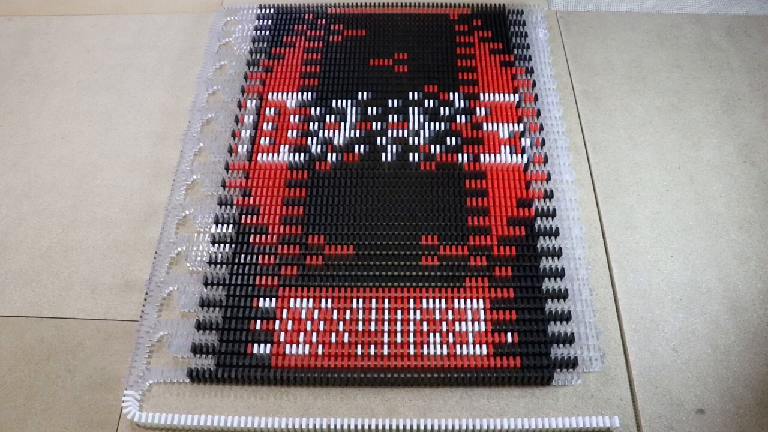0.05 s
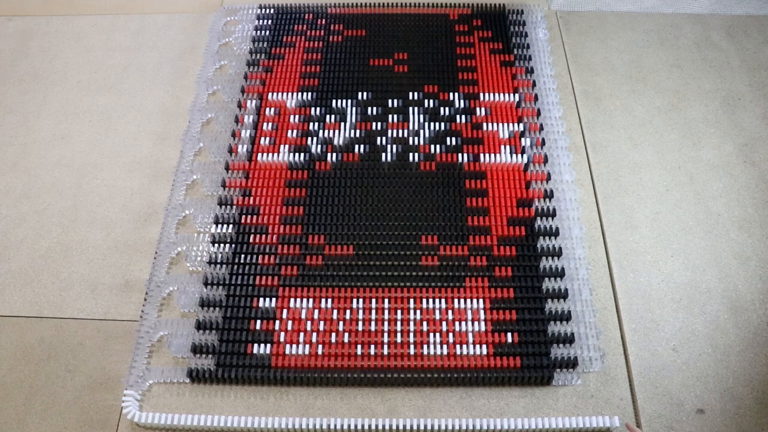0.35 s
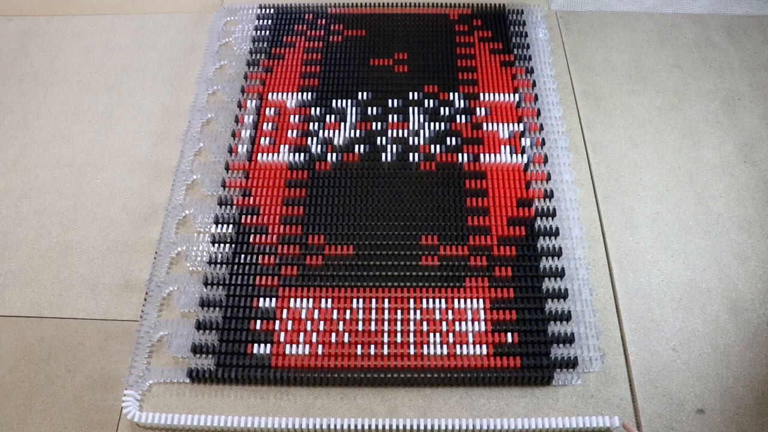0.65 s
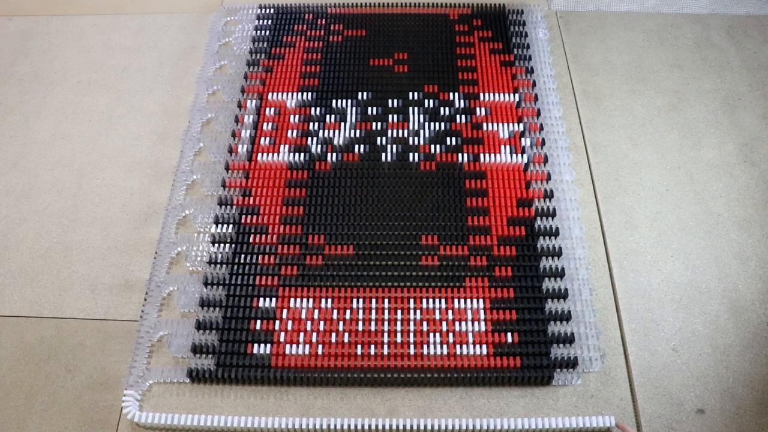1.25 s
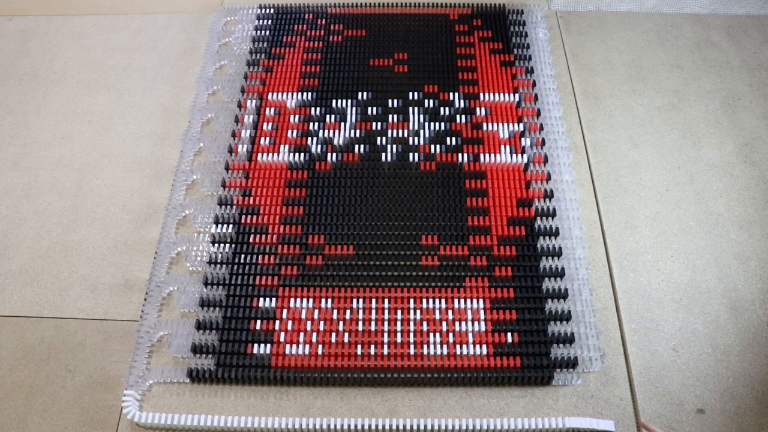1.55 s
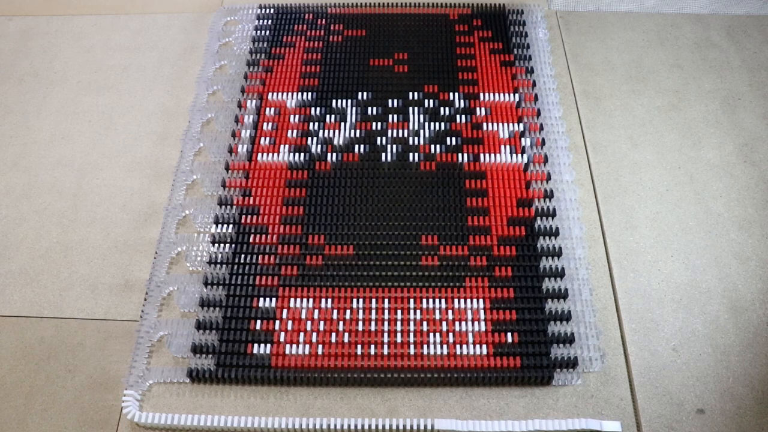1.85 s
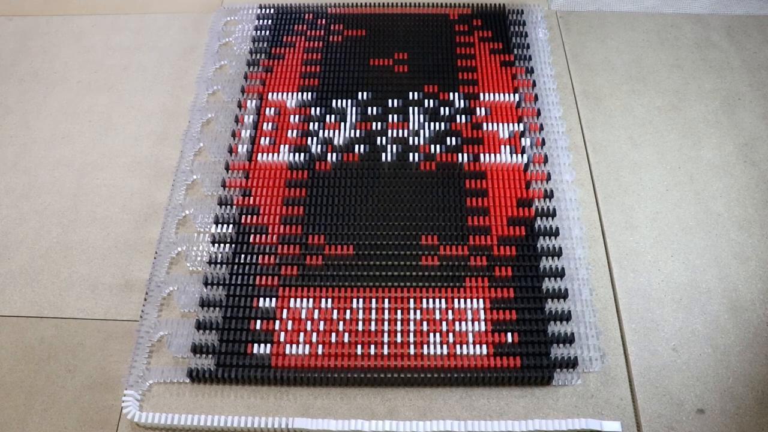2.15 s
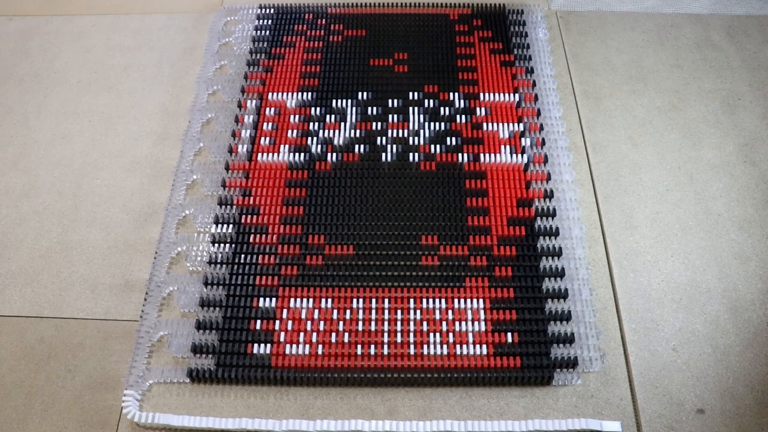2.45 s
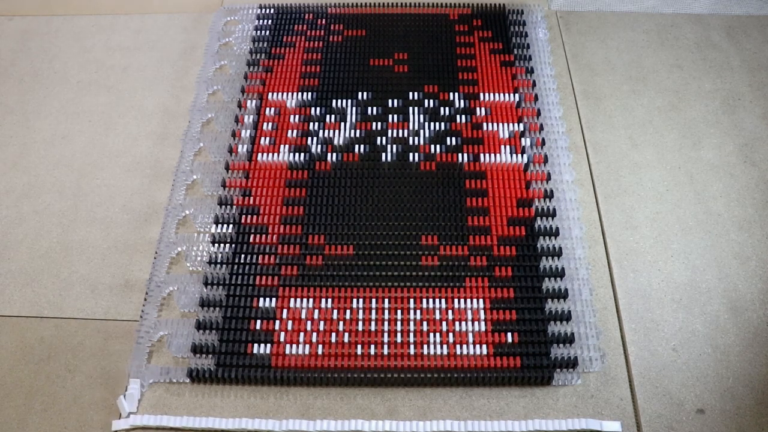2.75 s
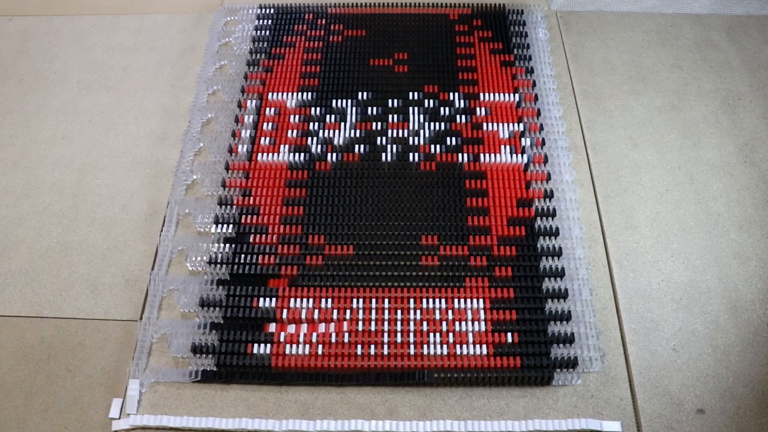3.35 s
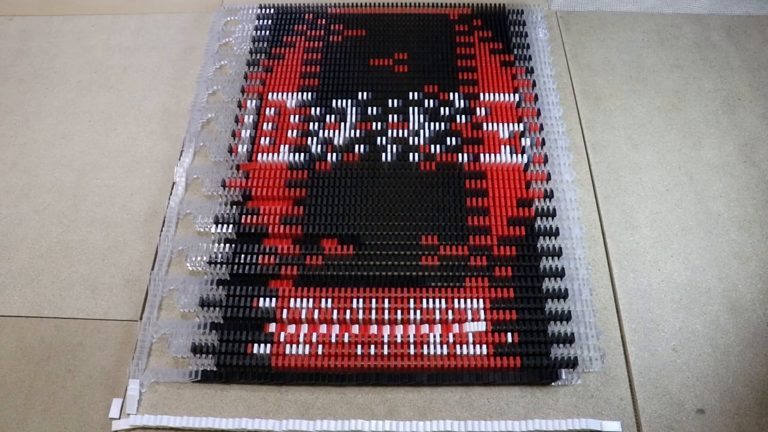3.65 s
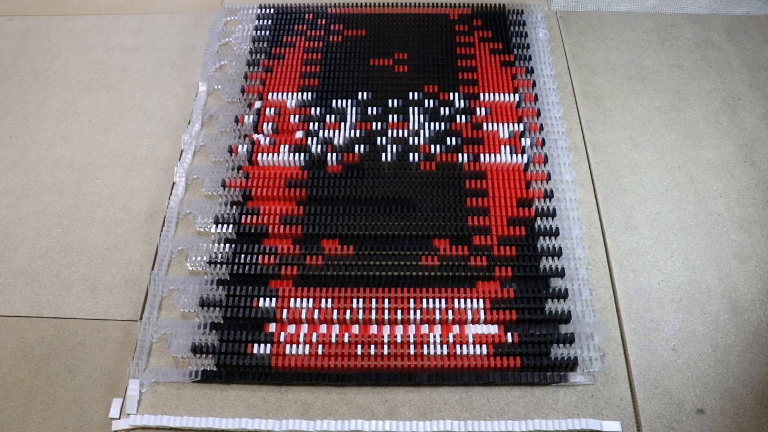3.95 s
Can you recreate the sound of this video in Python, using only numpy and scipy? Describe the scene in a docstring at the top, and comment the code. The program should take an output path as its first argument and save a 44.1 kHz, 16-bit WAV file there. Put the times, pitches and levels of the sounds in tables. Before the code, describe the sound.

Dominoes topple on a hard floor, a few clicks building into a dense rattling clatter.

```python
"""Dominoes topple on a hard floor in a quiet room. A row of white ones starts slowly, runs at an even
pace, knocks over a larger piece at the corner and sets off a row of clear, higher-ringing ones, while
a field of dominoes begins to fall beside it. Each strike is a tick, a rattle and a ring; fallen pieces
clatter and thud on the floor. The room echoes, with a faint hiss, hum and a few scuffs behind it all."""
import sys
import numpy as np
from scipy import signal
from scipy.fft import rfft, irfft
from scipy.io import wavfile

SR = 44100
rng = np.random.default_rng(int(sys.argv[2]) if len(sys.argv) > 2 else 0)


def pcm_store(signal):
    """Save signal as 16-bit PCM."""
    levels = np.round(np.clip(np.atleast_2d(signal), -1, 1) * 32767)
    wavfile.write(sys.argv[1], SR, levels.astype(np.int16).T)


N = 176400
T = np.arange(N) / SR
DOMINOES_PER_S, NUDGE_S = 68.3, 1.4066   # pace of a running row; when the first piece is tipped

# The tones of a white domino. Each row: pitch in Hz, relative level in dB, seconds to fade by 60 dB.
WHITE_TONES = [(4180,-15.5,0.041),(4590,-3.5,0.076),(4965,-11,0.062),(10400,-6,0.022),(11340,-2,0.027),(15200,-18,0.014)]


def from_db(db):
    """Turn decibels into a number to multiply by."""
    return 10 ** (np.asarray(db) / 20)


def rms_one(x):
    """Scale a sound to an average (rms) level of 1."""
    return x / np.sqrt(np.mean(x ** 2) + 1e-20)


def along(curve, s):
    """Read a curve at the given times."""
    return np.interp(s, *np.transpose(curve))


def clicks(s, size):
    """Clicks of the given sizes at the given times."""
    return np.bincount((np.ravel(s) * SR).astype(int), np.ravel(size), N)[:N]


def dying(s, db, t60):
    """A level that jumps up at time s, then fades by 60 dB every t60 seconds."""
    return (T > s) * from_db(db) * np.exp(-np.log(1000) * abs(T - s) / t60)


def coloured(x, points, size=8192):
    """Give a sound a colour, a balance of low and high pitches, that falls away beyond the end points."""
    hz, db = np.transpose(points)
    f = np.maximum(np.arange(size // 2 + 1) * SR / size, 1)
    gain = from_db(np.interp(np.log(f), np.log(hz), db))
    gain = gain / (1 + (f / hz[-1] / 2) ** 2) ** 2 / (1 + (hz[0] / f / 2) ** 2)
    cepstrum = irfft(np.log(gain))[:size // 2]   # keeping half means nothing sounds before its click
    response = irfft(np.exp(2 * rfft(cepstrum, size)))
    return signal.fftconvolve(x, rms_one(response) / np.sqrt(size))[:N]


def ring(x, hz, t60):
    """Each click starts a tone that fades by 60 dB in t60 seconds."""
    decay, angle = np.exp(-np.log(1000) / (t60 * SR)), 2 * np.pi * hz / SR
    return signal.lfilter([.5, 0, -.5], [1, -2 * decay * np.cos(angle), decay * decay], x + 1e-18)


def patter(per_s, spread_db):
    """Tiny taps at random times and of uneven strength."""
    size = from_db(spread_db * np.clip(rng.standard_normal(N), -2, 2)) * rng.choice([-1, 1], N)
    return rms_one(size * (rng.random(N) < per_s / SR))


def background(hum_hz=390, hum_t60=0.046):
    """Quiet hiss and rumble with a wavering hum."""
    # The colour of the room's air. Each row: pitch in Hz, relative level in dB.
    air_colour = [(25,-27),(45,-13),(62,-3.5),(100,-11.5),(138,3),(185,-12.5),(300,-8),(600,-16),(2200,-24),(15500,-25)]
    # How loud the hum is. Each row: time in seconds, level in dB.
    hum_level = [(.08,-56.5),(.25,-61),(.6,-66),(.71,-54.5),(.92,-68.5),(1.2,-60.5),(1.4,-59.5)]
    hum = rms_one(ring(ring(rng.standard_normal(N), hum_hz, hum_t60), hum_hz, hum_t60 / 2))
    air = from_db(-56) * coloured(rng.standard_normal(N), air_colour)
    return air + from_db(along(hum_level, T)) * hum


def room_echo(x, spots=14, delay_s=0.0068, treble_hz=6200):
    """The room's echo loses its treble first, and changes as the toppling travels across the floor."""
    t, echo = T[:SR], 0
    position = np.linspace(0, spots - 1, N)
    for spot in range(spots):
        response = 0
        for band, t60, db in (("low", 0.74, -5), ("high", 0.25, -4)):
            tail = rng.standard_normal(SR) * np.exp(-np.log(1000) * t / t60) * (t > delay_s)
            split = signal.butter(2, treble_hz, band, fs=SR, output="sos")
            response = response + from_db(db) * signal.sosfilt(split, tail / np.linalg.norm(tail))
        nearness = np.sqrt(np.maximum(1 - abs(position - spot), 0))
        echo = echo + signal.fftconvolve(x * nearness, response)[:N]
    return echo


def scuffs():
    """Faint, dull scuffs some way off, before the dominoes fall."""
    # Each row: start in seconds, level in dB, seconds to fade by 60 dB.
    events = [(.09,-55.5,0.44),(0.35,-57,0.92)]
    # Their colour. Each row: pitch in Hz, relative level in dB.
    colour = [(400,-1),(750,-14),(1200,-1.5),(1550,-5.5),(1900,-19),(6000,-23),(15000,-30)]
    return coloured(patter(2200, spread_db=5) * sum(dying(*scuff) for scuff in events), colour)


def floor_thud(fall_s, uneven_db=2):
    """Every fall pushes on the floor, so the pace of the row is heard as a low purr."""
    # How loud the purr is. Each row: time in seconds, level in dB.
    level = [(1.58,-48),(1.66,-39.5),(1.9,-41),(2.2,-45),(2.7,-43.5),(2.95,-42),(3.3,-51.5),(4,-48.5)]
    # The floor's deep colour. Each row: pitch in Hz, relative level in dB.
    colour = [(50,-18),(68,-2.5),(95,-5),(150,8),(180,-3),(290,-2.5),(500,-8),(2000,-93)]
    pushes = clicks(fall_s, from_db(along(level, fall_s))) * from_db(uneven_db * rng.standard_normal(N))
    return coloured(pushes * np.sqrt(SR / DOMINOES_PER_S), colour)


def floor_clatter():
    """Fallen pieces knock on the floor and on each other, along the rows and across the field."""
    # How loud each clatter is. Each row: time in seconds, level in dB.
    row_level = [(1.40,-61),(1.53,-59),(1.60,-40),(1.68,-35),(1.78,-25.5),(1.98,-28),(2.14,-24),(2.48,-28.5),(2.62,-26),(2.68,-36),(2.73,-28),(3.03,-26.5),(3.2,-34.5),(4,-44)]
    field_level = [(2.9,-91),(3.15,-27.5),(4,-27)]
    # Their colours. Each row: pitch in Hz, relative level in dB.
    row_colour = [(110, -41), (180, -12.5), (280, -9), (358, -12.5), (489, -5), (694, -8.5), (972, 0.5),
                  (1290, -1), (1420, 2.5), (2350, -4), (4000, -8.5), (5200, -31), (8800, -120)]
    field_colour = [(150,-16.5),(500,-15),(850,-15),(1080,-3),(1300,5.5),(1650,-3),(2400,-4),(4000,-7.5),(8000,-13)]
    rows = patter(900, spread_db=1) * from_db(along(row_level, T)) * (T > NUDGE_S)
    field = patter(1400, spread_db=0.5) * from_db(along(field_level, T)) * (T > field_level[0][0])
    return coloured(rows, row_colour) + coloured(field, field_colour)


def floor_knocks():
    """Single pieces land flat with a dull knock."""
    # The landings. Each row: start in seconds, strength in dB.
    landings = [(1.4833,-20),(1.538,-20),(1.689,-6),(1.725,-9),(2.813,-2),(3.868,-10)]
    # Their colour. Each row: pitch in Hz, relative level in dB.
    colour = [(420,0.5),(1050,3),(5000,-20)]
    s, db = np.transpose(landings)
    return coloured(clicks(s, from_db(db)), colour)


def nudge(ring_db=-18.5):
    """A dull tap tips the first white piece and sets it ringing."""
    # The tap's colour. Each row: pitch in Hz, relative level in dB.
    colour = [(900,-10),(2600,0),(4800,2.5),(9000,-9)]
    tap = clicks(np.array([NUDGE_S]), from_db([-11]))
    tones = sum(from_db(db + ring_db) * ring(tap, hz, t60) for hz, db, t60 in WHITE_TONES[1:3])
    return coloured(tap, colour) + tones


def corner_piece(low_cut_hz=230, rattle_low_cut_hz=690):
    """A larger piece slaps down, bounces and rattles to rest."""
    # Its landing and bounces. Each row: start in seconds, strength in dB.
    hits = [(2.7552,5.5),(2.7572,9),(2.7645,-3),(2.772,-17)]
    # The slap's colour. Each row: pitch in Hz, relative level in dB.
    colour = [(330,0),(800,-1),(1100,-6),(1700,2),(5000,-9),(8000,-26)]
    # Its tones. Each row: pitch in Hz, relative level in dB, seconds to fade by 60 dB.
    tones = [(570,-31,0.013),(1604,-27.5,0.02),(2070,-32,0.03)]
    s, db = np.transpose(hits)
    rattle = patter(2300, spread_db=4.5) * dying(s[0], db=-18, t60=0.63)
    # The small bounces lack the weight of the first slap.
    rattle = signal.lfilter(*signal.butter(1, rattle_low_cut_hz, "high", fs=SR), rattle)
    contacts = clicks(s, from_db(db)) + rattle
    body = sum(from_db(level) * ring(contacts, hz, t60) for hz, level, t60 in tones)
    slap = from_db(-3.5) * coloured(contacts, colour)
    return signal.sosfilt(signal.butter(2, low_cut_hz, "high", fs=SR, output="sos"), body + slap)


def shape_treble(x, curve, treble_hz=8600):
    """Let the treble (the highest pitches) follow a level curve."""
    splits = (signal.butter(2, treble_hz, band, fs=SR, output="sos") for band in ("low", "high"))
    low, high = (signal.sosfilt(np.tile(split, (2, 1)), x) for split in splits)
    return low + high * from_db(along(curve, T))


def topple(main_strikes, run_level, start_s, snap_db, rattle_db, jitter_s=.0007, most=128):
    """Once a row is running, more dominoes fall at a nearly even pace between the main strikes."""
    times = np.array(main_strikes)[:, 0]
    s = np.concatenate([np.linspace(a, b, max(round((b - a) * DOMINOES_PER_S), 1), endpoint=False)[1:]
                        for a, b in zip(times, times[1:]) if a > start_s])
    lateness, uneven_db = rng.standard_normal((most, 2))[:len(s)].T
    db = along(run_level, s) + uneven_db
    return np.vstack([main_strikes, np.transpose([s + jitter_s * lateness, db + snap_db, db + rattle_db])])


def collisions(strikes, colour, tones, snap_db, tick_db, lean_db, detune, count=16, most=128):
    """Each strike snaps, rebounds and jolts the leaning pieces; these contacts tick and ring."""
    # The ring is weaker in the first slow strikes. Each row: time in seconds, relative level in dB.
    ring_level = [(1.6,-4),(1.8,0)]
    rebound_s, lean_s, snap_lag_s = .0036, 0.015, .0012   # all counted from the first touch
    lean_soft_hz, snap_ring_db = 5430, -29.5
    s, strike_db, rattle_db = strikes.T[:, :, None]
    # Early contacts are bounces against a neighbour; later, duller ones run down the leaning chain.
    early = np.arange(count) < count // 2
    when = s + rng.random((most, count))[:len(s)] * np.where(early, rebound_s, lean_s)
    force = from_db(3.5 * rng.standard_normal((most, count)) + lean_db * ~early)
    force *= rng.choice([-1, 1], (most, count))
    force = (force / np.linalg.norm(force, axis=1, keepdims=True))[:len(s)] * from_db(rattle_db)
    soften = signal.butter(1, lean_soft_hz, fs=SR)
    piece = rng.permuted(np.tile(np.arange(count), (most, 1)), axis=1)[:len(s)]
    # Rebounds stay within the pair that collides.
    piece = piece[:, np.where(early, np.arange(count) % 2, np.arange(count))]
    ticks, rings = clicks(s + snap_lag_s, from_db(strike_db + snap_db)), 0
    for k, offset in enumerate(np.linspace(-1, 1, count)):
        own_force = force * (piece == k)
        leaning = signal.lfilter(*soften, clicks(when, own_force * ~early) + 1e-18)
        contacts = clicks(when, own_force * early) + leaning
        ticks = ticks + from_db(tick_db) * contacts
        snaps = clicks(s + snap_lag_s, from_db(strike_db + snap_ring_db) * (piece[:, :1] == k))
        tuning = 1 + detune * offset * (1 + offset ** 2) / 2   # no two pieces have quite the same pitch
        for hz, db, t60 in tones:
            sign = rng.choice([-1, 1], p=[.2, .8])
            rings = rings + sign * from_db(db) * ring(contacts + snaps, hz * tuning, t60)
    return coloured(ticks, colour) + rings * from_db(along(ring_level, T))


def domino_rows():
    """The white row topples, then the clear one; gives their sound and the time of every fall."""
    # The first and loudest strikes. Each row: start in seconds, relative snap and rattle levels in dB.
    white_strikes = [(1.537, -21, -32.5), (1.58, -1.5, -20.5), (1.6126, -18, -25.5), (1.642, -14, -20.5),
                     (1.6649, 0.5, -19), (1.6866, -21, -23), (1.707, -21, -17), (1.7245, -29, -18.5),
                     (1.7403, -28, -16.5), (1.7574, -9, -16.5), (1.8035, -13, -15.5), (1.8326, -7, -12.5),
                     (1.8467, -14, -17), (1.8624, -15, -12.5), (1.8924, -7, -15), (1.919, -12, -13.5),
                     (2.0095, -32, -18.5), (2.0947, -16, -13.5), (2.1656, 5.5, -17), (2.2438, -10, -17),
                     (2.3484, -17, -15.5), (2.4231, -5, -16), (2.5265, -20, -13.5), (2.597, 3, -16),
                     (2.706, -29, -16), (2.7237, -5, -13.5), (2.7387, -8, -19)]
    clear_strikes = [(2.699, -36, -21.5), (2.805, -21, -22.5), (2.8274, -15, -19), (2.8466, -11, -18),
                     (2.8636, -10, -13), (2.8987, -16, -12), (2.9556, 6.5, -20), (2.9717, -7, -13.5),
                     (3.0177, -7, -11), (3.05, -1, -12), (3.158, 3.5, -18.5), (3.222, 8.5, -18.5),
                     (3.24, -10, -12), (3.2829, -9, -19), (3.4421, -20, -18), (3.5423, -3, -13),
                     (3.7627, 0, -17), (3.8478, -12, -13), (3.9934, -9, -13.5)]
    # The strength of the strikes in between. Each row: time in seconds, relative level in dB.
    white_run = [(1.75,-16.5),(1.88,-23),(1.989,-19.5),(2.15,-19),(2.45,-17.5),(2.63,-20.5),(2.66,-29),(2.698,-27)]
    clear_run = [(2.86,-16),(3.1,-16.5),(3.35,-15),(3.7,-16.5),(4,-18.5)]
    # The colour of a tick. Each row: pitch in Hz, relative level in dB.
    white_tick = [(350,-8.5),(1500,-9.5),(3000,-11),(4500,0),(5800,3),(7200,4.5),(8600,-10.5),(9700,-2.5),(11000,2),(12000,-8),(13200,0),(14500,-17)]
    clear_tick = [(300,-28.5),(1500,7.5),(3000,-9.5),(4800,-2),(6200,5.5),(7400,2),(8600,-7),(9600,7),(11300,2),(15000,-8)]
    # A clear domino's tones. Each row: pitch in Hz, relative level in dB, seconds to fade by 60 dB.
    clear_tones = [(5303,6,0.038),(5550,-3.5,0.049),(5770,1,0.031),(10380,-13,0.028),(12150,-2.5,0.04),(13310,1.5,0.027)]
    # How bright the dominoes sound. Each row: time in seconds, treble boost or cut in dB.
    white_treble = [(1.68,-4.5),(1.89,0),(1.99,-1),(2.7,-8.5)]
    clear_treble = [(2.8,-3),(3.2,1)]
    white = topple(white_strikes, white_run, start_s=1.73, snap_db=4, rattle_db=1)
    clear = topple(clear_strikes, clear_run, start_s=2.85, snap_db=5, rattle_db=-0.5)
    white_row = collisions(white, white_tick, WHITE_TONES, snap_db=2, tick_db=19, lean_db=-6, detune=0.03)
    clear_row = collisions(clear, clear_tick, clear_tones,
                           snap_db=-4.5, tick_db=16, lean_db=5.5, detune=0.016)
    sound = shape_treble(white_row, white_treble) + shape_treble(clear_row, clear_treble)
    return sound, np.concatenate([white[:, 0], clear[:, 0]])


def scene():
    """Both rows, the corner piece and the floor, in the room's quiet air."""
    rows, fall_s = domino_rows()
    direct = rows + nudge() + floor_clatter() + floor_knocks() + corner_piece() + scuffs()
    return (direct + floor_thud(fall_s) + room_echo(direct) + background())[None]


def record(dry, ceiling=.9, cutoff_hz=15650):
    """Round off the loudest peaks and cut away the very highest pitches."""
    rounded = dry / (1 + (dry / ceiling) ** 4) ** .25
    return signal.sosfilt(signal.ellip(10, .1, 80, cutoff_hz, fs=SR, output="sos"), rounded)


dry = scene()
out = record(dry)
pcm_store(out)
```